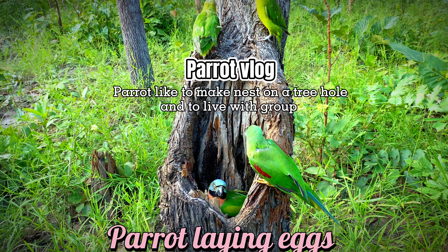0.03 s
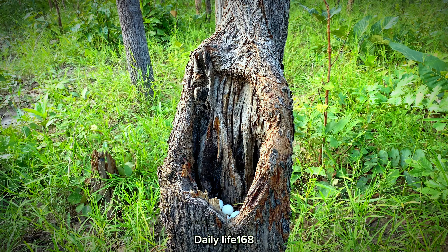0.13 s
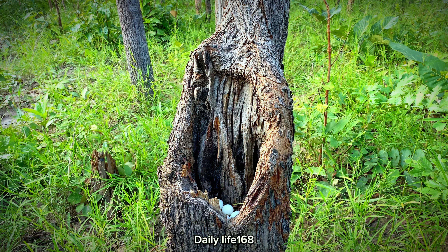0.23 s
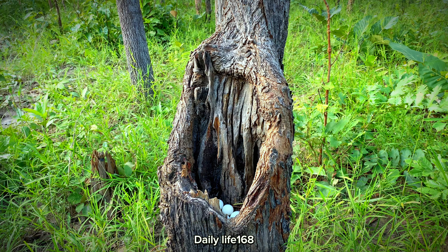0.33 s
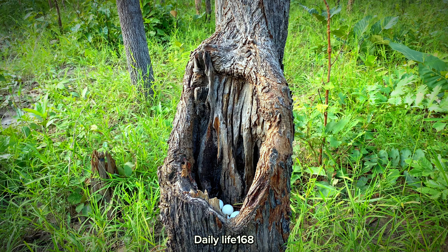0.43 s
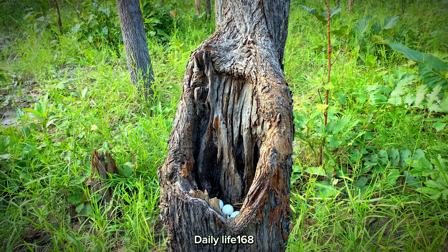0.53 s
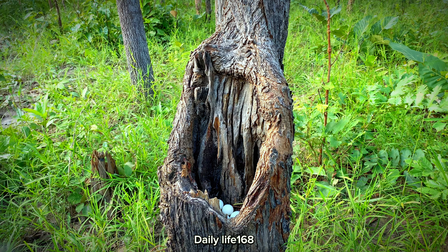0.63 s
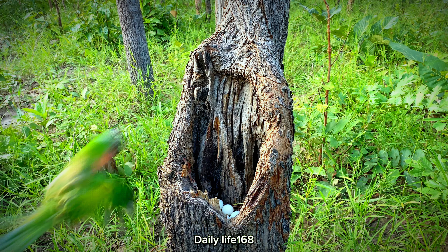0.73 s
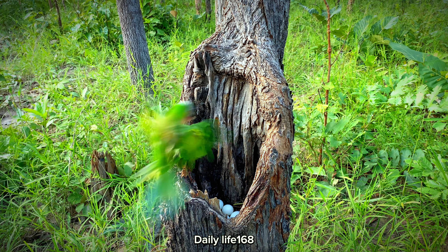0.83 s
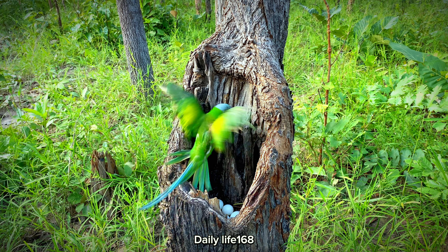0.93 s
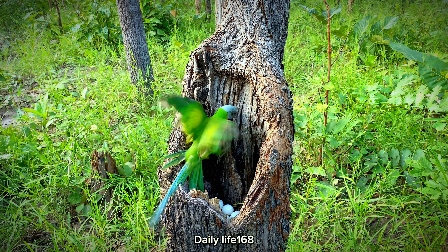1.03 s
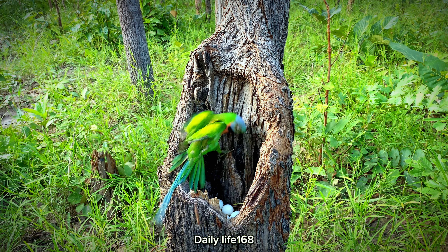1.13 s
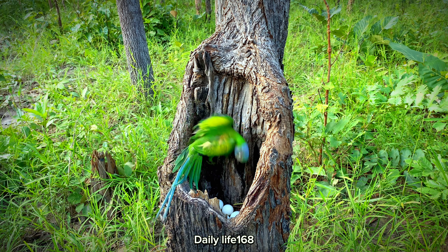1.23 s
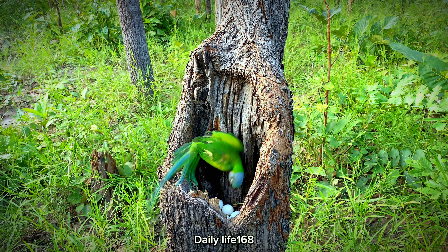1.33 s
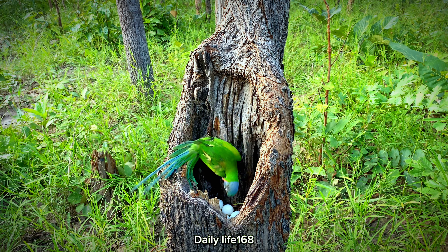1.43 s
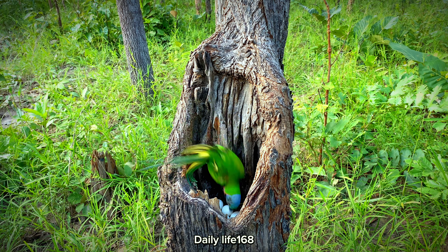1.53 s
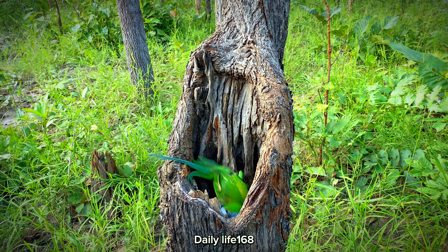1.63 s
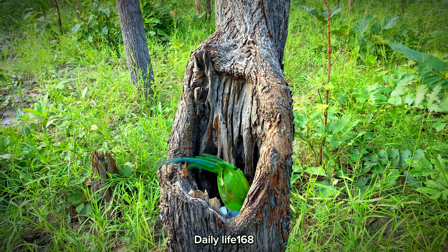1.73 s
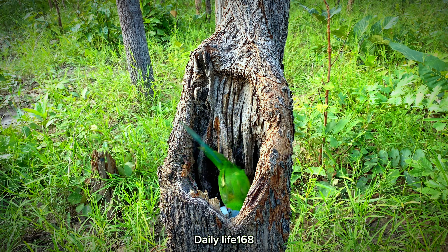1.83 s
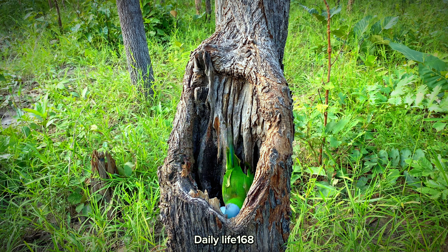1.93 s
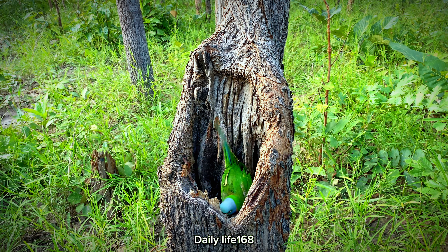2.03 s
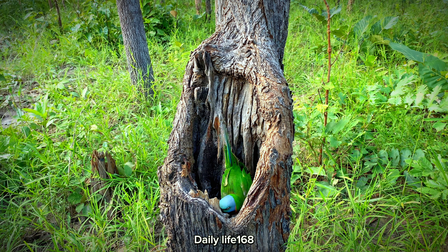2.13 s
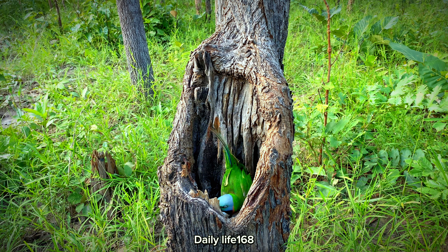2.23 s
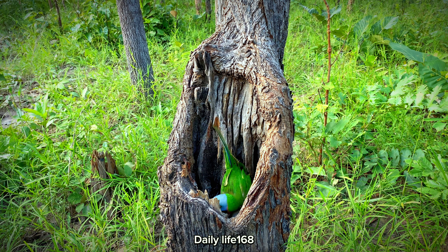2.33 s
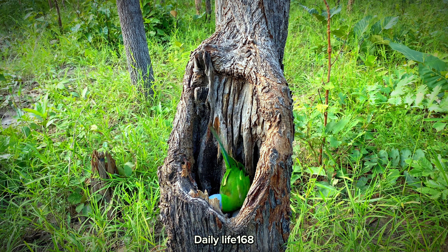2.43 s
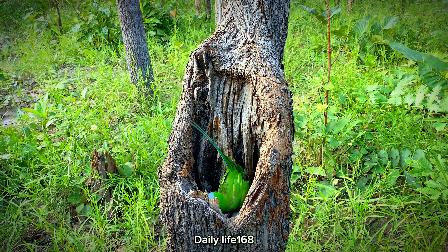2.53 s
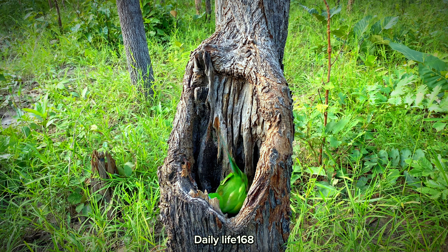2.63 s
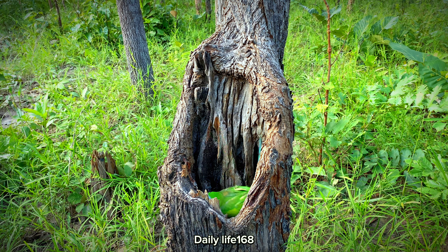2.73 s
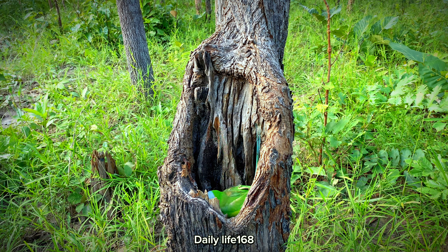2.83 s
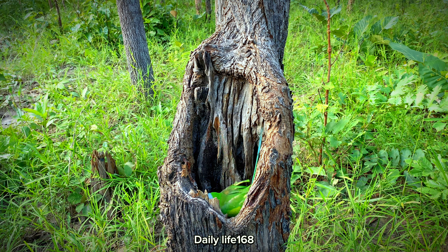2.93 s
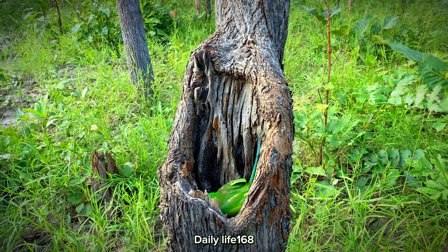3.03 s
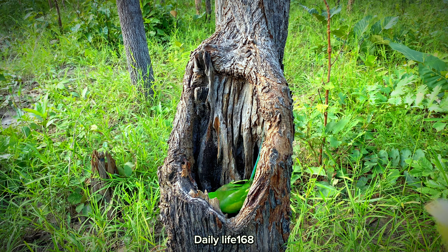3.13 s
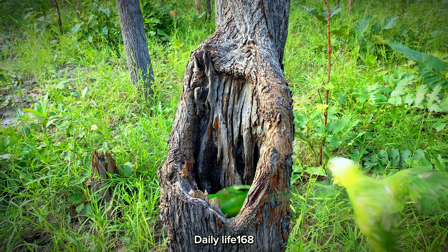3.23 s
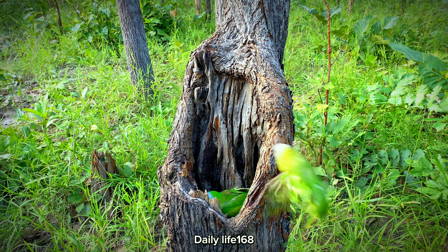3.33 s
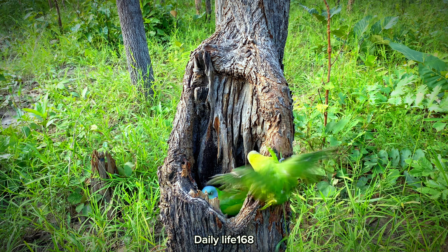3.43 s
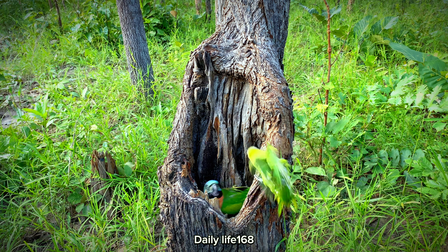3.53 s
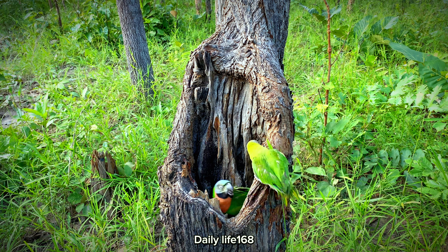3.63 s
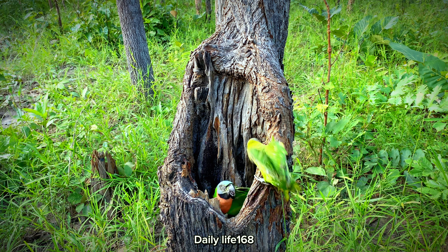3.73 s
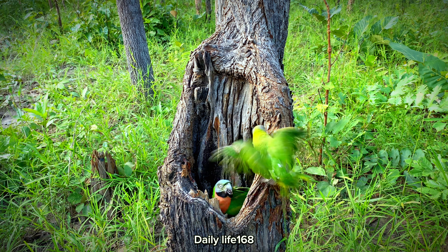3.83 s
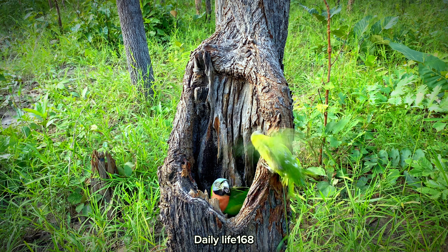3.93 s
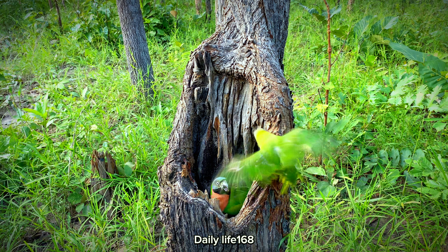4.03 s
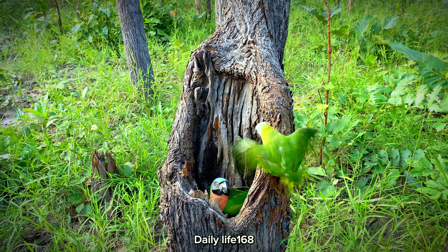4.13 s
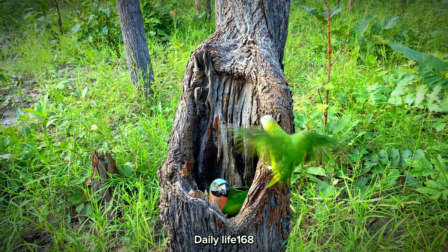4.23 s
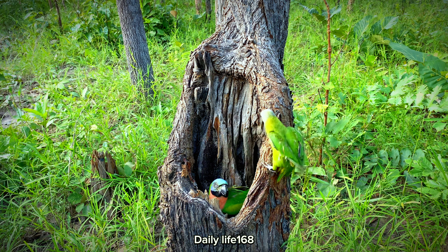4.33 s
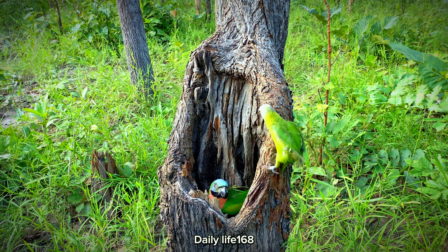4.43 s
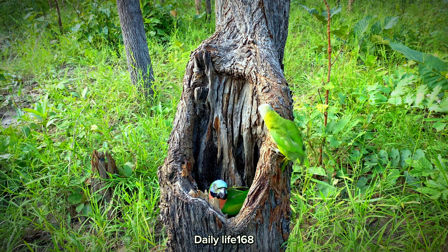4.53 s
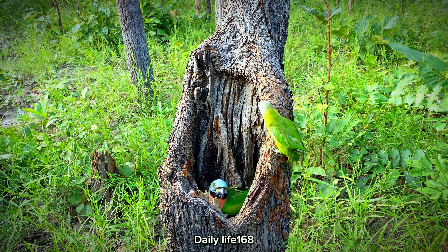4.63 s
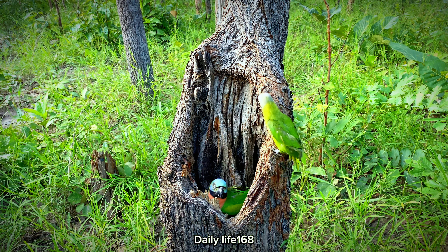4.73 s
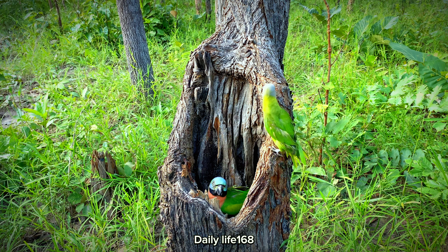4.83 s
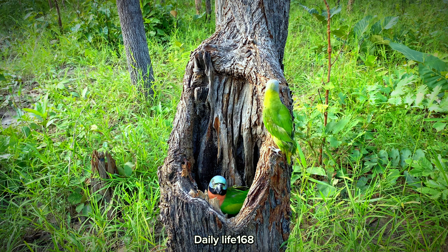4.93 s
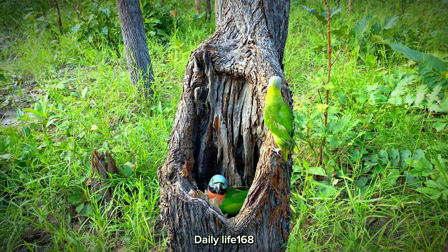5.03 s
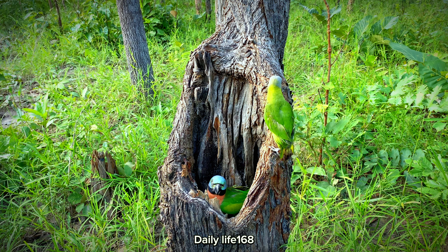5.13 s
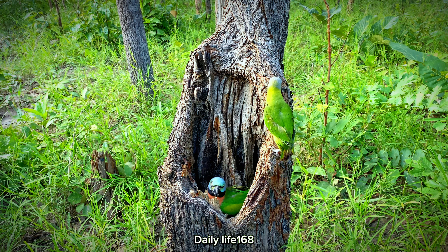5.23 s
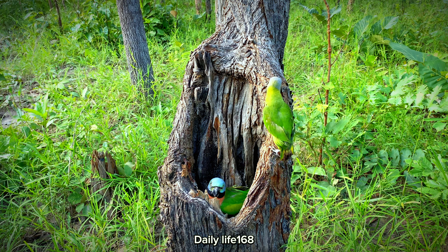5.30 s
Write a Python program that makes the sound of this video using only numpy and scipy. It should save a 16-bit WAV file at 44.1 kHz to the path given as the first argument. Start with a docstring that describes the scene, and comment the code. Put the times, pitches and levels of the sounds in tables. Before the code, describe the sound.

Outdoors among trees, a parakeet's wings suddenly clap and flutter close to the microphone. Its claws tick and scrape on a hollow trunk while its feathers rustle. A second flurry of wingbeats follows, then a dry rasp of stiff feathers and more light scratching, before a third flurry with another rasp. A distant engine drones in a steady low rumble behind, with faint insects.

```python
"""A sudden clap of wings opens the first of three flurries as parakeets fly to a hollow tree.
Wings push air, feathers rustle and slap together, and twice stiff feathers slip with a dry rasp.
Between flights the birds shuffle their plumage, and claws tick, scrape and squeak on the bark.
Behind them a distant engine drones in a low outdoor rumble, with faint insects and a dull ticking."""
import sys
import numpy as np
from scipy import signal
from scipy.fft import rfft, irfft, next_fast_len
from scipy.io import wavfile
from scipy.ndimage import uniform_filter1d, map_coordinates

SR = 44100
rng = np.random.default_rng(int(sys.argv[2]) if len(sys.argv) > 2 else 0)


def master(y):
    """Save y as 16-bit WAV."""
    cut = np.clip(np.atleast_2d(y).T, -1, 1)
    pcm = np.round(cut * 32767)  # scale
    wavfile.write(sys.argv[1], SR, pcm.astype(np.int16))


N = 264600
TIME = np.arange(N) / SR
CENTRE, SIDES = np.array([[1], [0]]), np.array([[.5], [-.5]])  # spread() puts row 0 in the centre

# Levels in the tables are relative: the functions add their own gains.
# The tone colour of each noise: f/Hz, level/dB
RUMBLE_COLOUR = [(20, -21), (35, 0.5), (52, -4.5), (90, 1.5), (135, 4.5), (180, -7), (280, -17),
                 (480, -13.5), (680, -19.5), (1200, -29.5), (3000, -51), (7000, -57.5), (15000, -52)]  # the outdoors
TRUNK_COLOUR = [(150, -31), (420, 3), (700, -1), (1200, -22), (3000, -23), (9000, -29)]  # hollow wood
FEATHER_COLOUR = [(300, 12), (700, 5.5), (950, 6), (2000, 8.5), (4500, 6.5), (7000, 3), (10000, 9),
                  (14000, -2.5), (15200, 2), (16300, -24)]  # sliding feathers
RASP_EQ = [(100, -3), (250, -6), (330, 1), (680, 0.5), (1020, -9.5), (1300, 1.5), (2300, -0.5), (2900, 2.5),
           (3300, -0.5), (9500, -1.5), (11500, -3), (14000, -2.5)]  # stiff feathers, on top of their resonances
AIR_COLOUR = [(20, -11), (45, 4.5), (85, 4), (170, -5), (260, -15), (500, -43.5)]  # air pushed by a wing
SWISH_COLOUR = [(120, -13), (250, 4.5), (450, 6), (660, 8.5), (820, -5.5), (1200, -9), (2000, -20.5)]  # air through the wing tips
CRACK_COLOUR = [(300, -6.5), (700, -19), (1000, -11), (1400, -1.5), (2000, -2.5), (4000, 3.5), (7000, -2),
                (10000, 1.5), (14000, -7.5), (16500, -12.5)]  # sharp hits of feathers and claws

# Tones of the far engine: f/Hz, level/dB
ENGINE_TONES = [(57.5, -48), (114, -45)]
# Shrill insect bands: f/Hz, width/Hz, level/dB
INSECT_BANDS = [(4570, 590, -64), (7720, 550, -69)]
# Feet and bodies scuffing wood: middle t/s, half length/s, grating level/dB, trunk level/dB, f/Hz
BARK_SCUFFS = [(0.837, 0.013, -42, -40.5, 1950), (0.974, 0.006, -36, -60, 6000),
               (1.134, 0.0083, -49, -67, 1550), (1.216, 0.014, -42, -74, 3900),
               (1.561, 0.024, -56, -42.5, 1830), (1.603, 0.019, -54, -40.5, 1870),
               (1.644, 0.031, -50, -45, 2300), (1.788, 0.0082, -52, -43, 1500),
               (1.881, 0.023, -54, -60, 1800), (1.997, 0.012, -60, -46, 1490),
               (2.717, 0.07, -65.5, -44, 2070), (2.832, 0.081, -77, -47, 2200),
               (3.024, 0.0052, -46, -28.5, 1410), (3.446, 0.016, -39.5, -41, 2040),
               (3.898, 0.091, -54, -41, 2400), (4.123, 0.0063, -40.5, -46, 2290),
               (4.212, 0.036, -56, -48.5, 2380), (4.307, 0.0083, -72, -44.5, 2200),
               (3.962, 0.0081, -36, -33.5, 2200), (3.981, 0.0077, -27.5, -27, 2100),
               (5.407, 0.011, -48, -50, 2100), (5.445, 0.017, -43.5, -51, 2240),
               (5.483, 0.016, -43.5, -46, 2300)]
# Skidding claws: middle t/s, half length/s, level/dB, f/Hz, glide/(Hz/s)
CLAW_SKIDS = [(1.136, .008, -53, 1406, 0.5), (1.222, 0.014, -48, 2380, -6000),
              (1.879, 0.019, -48.5, 1873, 5000)]
# Claws snagging bark: t/s, level/dB, f/Hz, extra gain of the tick/dB
CLAW_SNAGS = [(0.8232, -18.5, 1900, -13), (1.1507, -37, 5200, -1), (1.442, -41, 5870, 3),
              (1.468, -36, 4580, -1), (1.5125, -20, 4000, 0), (1.526, -21.5, 3300, -15),
              (1.531, -28, 3430, -12), (1.546, -21, 2870, -1), (1.564, -25, 4400, -3.5),
              (1.5662, -25.5, 6550, -3), (1.588, -34, 1860, -9), (1.6207, -19, 1500, -20),
              (1.622, -26, 3480, -18), (1.6303, -29, 1900, -18), (1.635, -27, 3000, -18.5),
              (1.64, -37, 1790, -15), (1.648, -36, 3130, -14), (1.6622, -31.5, 2790, -18),
              (1.665, -33, 2300, -18), (1.697, -36, 1900, -14), (1.7725, -20.5, 4700, 0),
              (2.593, -42.5, 4370, 2.5), (2.658, -34.5, 4100, -3), (3.5579, -34.5, 6030, -2),
              (3.67, -37, 3740, -16), (4.2045, -37, 4350, -5), (4.24, -37, 2680, 1), (4.373, -40, 4030, 3),
              (4.381, -40, 6000, 0), (4.5326, -39, 6030, -1), (4.7895, -38, 3200, -4),
              (4.9665, -43.5, 4540, -2)]
# A bird shifting its plumage: start t/s, end t/s, level/dB
PLUMAGE_SHUFFLES = [(0.954, 1.385, -54), (1.535, 1.58, -48), (1.777, 1.914, -57.5), (2.43, 2.99, -64.5),
                    (2.822, 2.85, -56), (3.51, 3.525, -52), (3.822, 4.342, -53), (3.866, 3.891, -43),
                    (4.775, 4.97, -71), (5.203, 5.376, -62), (5.445, 5.52, -44)]
# Stiff feathers rasping: t/s, rise/s, fall/s, level/dB, slips/(1/s), left minus right/dB,
# pitch factor, hollow tone level/dB, its glide/(Hz/s), t/s at which a resonance sinks
FEATHER_RASPS = [(3.997, 0.016, 0.036, -23, 230, 0.5, 1, -29, 500, 4.0),
                 (5.912, 0.024, 0.025, -19, 340, 0.5, 1.03, -24, 700, 5.897)]
# Resonances of a rasp: base f/Hz, base width/Hz, level/dB
RASP_RESONANCES = [(427, 220, 2), (610, 230, -2.5), (1490, 220, -1.5), (1980, 610, -6), (3330, 110, 2),
                   (3900, 270, 1), (4950, 260, 1.5), (5910, 280, -9.5), (7130, 270, -12.5), (8870, 510, -9),
                   (14000, 1500, -27)]
# Hard catches within the rasps: t/s, level/dB
RASP_CATCHES = [(3.9745, -20), (3.9831, -21), (3.9866, -18), (3.9929, -10.5), (3.9965, -14),
                (4.0041, -11.5), (4.0165, -12), (4.027, -22), (4.0344, -17), (4.0484, -24.5), (5.9185, -18),
                (5.9263, -20), (5.9333, -19), (5.9415, -27)]
# Flurries of flight: start t/s, end t/s, air level/dB, swish level/dB, rustle level/dB, hollow f/Hz
FLURRIES = [(0.547, 0.922, -33.5, -45.5, -47.5, 444), (3.024, 3.426, -31, -43, -44, 641),
            (5.53, 6, -35.5, -39.5, -40.5, 432)]
# Heavy wing strokes: t/s, air level/dB, swish level/dB, hollow tone level/dB, its f/Hz
HEAVY_STROKES = [(.645, -24, -39.5, -37, 478.6), (0.84, -37.5, -36, -39, 388),
                 (0.913, -28.5, -35, -29.5, 189), (3.112, -25.5, -41, -42, 780), (3.14, -34, -36, -34, 649),
                 (3.218, -36.5, -42.5, -33.5, 310), (3.291, -33, -38.5, -33.5, 370),
                 (3.356, -41, -39, -35, 570), (5.532, -24.5, -31.5, -41, 560),
                 (5.622, -25, -32.5, -45, 512), (5.684, -26.5, -34.5, -34, 247), (5.72, -20, -38, -31, 240),
                 (5.745, -38, -35.5, -30, 581), (5.79, -37.5, -29.5, -28, 620), (5.77, -28, -37, -32, 200),
                 (5.816, -41.5, -35.5, -28, 487), (5.985, -31, -35, -33.5, 530)]
# Wing claps: t/s, crack level/dB, thump level/dB, thump f/Hz, crack fade time/s,
# quill f/Hz, extra gain of the snap/dB, slap level/dB, slap f/Hz
WING_CLAPS = [(0.5545, -20.5, -17, 400, 0.0055, 1970, 20, -24.5, 890),
              (0.6313, -12, -18, 330, 0.028, 2200, 0.5, -22, 950),
              (0.6376, -25.5, -10, 165, 0.025, 2100, -4, -26, 650),
              (0.7288, -16.5, -23, 526, 0.0076, 4000, 9.5, -22.5, 1190),
              (0.8718, -19, -16, 430, 0.02, 5100, 0, -31.5, 700),
              (0.889, -10, -11, 430, 0.013, 2150, 6, -9.5, 1080),
              (0.8966, -20, -13, 210, 0.03, 4100, 8.5, -11, 860),
              (0.984, -9.5, -13.5, 560, 0.021, 2000, 0.5, -9.5, 940),
              (3.044, -22.5, -17.5, 636, 0.022, 1870, 3, -30, 1700),
              (3.0691, -21, -24, 325, 0.026, 3880, 3.5, -28, 1600),
              (3.1054, -15.5, -22, 312, 0.026, 2120, -2, -33, 1590),
              (3.179, -14, -17.5, 655, 0.028, 4200, 3.5, -23, 1900),
              (3.1932, -25.5, -25.5, 576, 0.042, 2480, -6, -31, 1400),
              (3.2512, -18, -21.5, 467, 0.024, 2360, -1, -31, 900),
              (3.2673, -26.5, -32.5, 400, 0.03, 2300, 0.5, -43, 900),
              (3.3223, -19.5, -26, 692, 0.039, 2940, 0, -34, 1300),
              (3.338, -26, -26.5, 585, 0.094, 2030, -2, -40, 900),
              (3.391, -16, -12, 463, 0.0383, 2720, -3, -25, 870),
              (3.8756, -27, -26.5, 420, 0.035, 3480, 0, -40, 900),
              (5.5468, -13.5, -15, 216, 0.033, 2100, 1.5, -18.5, 900),
              (5.5535, -25.5, -25, 400, 0.022, 1840, -0.5, -22, 1820),
              (5.6143, -31.5, -28, 348, 0.13, 2300, -10, -30, 950),
              (5.6612, -27, -20, 248, 0.02, 2640, 2.5, -28, 780),
              (5.665, -36, -15, 180, 0.02, 2500, -4, -40, 650),
              (5.71, -25, -26, 580, 0.068, 2420, -5, -26.5, 900),
              (5.7485, -23.5, -15.5, 342, 0.046, 2680, -3.5, -23, 750),
              (5.7788, -19, -10.5, 423, 0.076, 1520, 5, -15, 1090),
              (5.797, -20, -23, 580, 0.022, 2020, -0.5, -28, 1600),
              (5.9559, -15.5, -10, 425, 0.025, 3870, 0.5, -24, 1100)]

# How alike left and right are: f/Hz, likeness (0 unrelated, 1 the same)
NEAR_LIKENESS = [(200, .97), (700, .93), (1500, .75), (3000, .75), (5500, .68), (8000, .92), (14500, .9)]  # the birds
FAR_LIKENESS = [(150, 0.96), (550, 0.22), (1600, 0.043), (5000, .2)]  # distant sound
RASP_LIKENESS = [(400, 0.97), (5000, 0.39)]  # a rasp, which comes from one spot
# How far the left channel leads the right: f/Hz, phase/rad
LEFT_LEAD = [(100, 0), (700, -.3), (1200, .8), (3000, 1.4), (5500, 1.3), (6700, 0), (8350, -3.14),
             (10100, -6.28), (12150, -9.42), (14000, -12.57), (15800, -15.7)]
# How much louder the left channel is: f/Hz, level/dB
LEFT_GAIN = [(60, -1.5), (130, -3.5), (300, 1), (700, 0.5), (1300, 0.5), (2200, 1.5), (4500, 4), (7500, 2),
             (9500, 0)]


def amp(db):
    """Turn decibels into a gain; amp(-60 * t / t60) fades by 60 dB in t60 seconds."""
    return 10 ** (np.asarray(db) / 20)


def unit(x):
    """Scale x to an average (rms) level of 1."""
    return x / np.sqrt(np.mean(x ** 2) + 1e-20)


def along(points, hz):
    """Read between (Hz, value) points on a log frequency axis."""
    f, v = np.transpose(points)
    return np.interp(np.log(hz + 1), np.log(f + 1), v)


def wobble(rate):
    """A smooth random curve through `rate` points a second."""
    return map_coordinates(rng.standard_normal(int(N * rate / SR) + 4), [TIME * rate])


def white(size=N):
    """Two unrelated hisses."""
    return rng.standard_normal((2, size))


def gritty(grit_db, rate):
    """Two hisses broken into tiny grains of uneven size."""
    return white() * amp(grit_db * wobble(rate))


def filtered(x, response):
    """Give each frequency in x the gain and phase of response(hz)."""
    n = x.shape[-1]
    padded = next_fast_len(n + 8192)
    return irfft(rfft(x, padded) * response(np.fft.rfftfreq(padded, 1 / SR)), padded)[..., :n]


def coloured(x, colour):
    """Give x a tone colour, at level 1."""
    return unit(filtered(x, lambda hz: amp(along(colour, hz))))


def resonance(hz, centre, width):
    """The response of something that rings near one pitch."""
    return 1j * hz * width / (centre ** 2 - hz ** 2 + 1j * hz * width)


def ringing(hz, share, size=N):
    """Two noises ringing near hz; a larger share of that pitch makes the band wider."""
    return unit(filtered(white(size), lambda f: resonance(f, hz, share * hz) ** 2))


def gliding(hz, width):
    """Two noises ringing near a pitch that moves."""
    slow = lambda: filtered(white(len(hz)), lambda f: 1 / (1 + (2 * f / width) ** 4))
    phase = 2 * np.pi * np.cumsum(hz) / SR
    return unit(slow() * np.cos(phase) + slow() * np.sin(phase))


def fluttering(hz, size, waver=0.062, rate=160):
    """A tone whose pitch flutters, in row 0 only."""
    bend = map_coordinates(rng.standard_normal(256), [np.arange(size) * rate / SR])
    cycles = np.cumsum(hz * (1 + waver * bend)) / SR + rng.random()
    return np.sqrt(2) * np.sin(2 * np.pi * cycles) * CENTRE


def held(start, end, attack_s=0.037, release_s=0.082):
    """A loudness curve that grows until start, holds until end and dies away."""
    return np.exp(-np.maximum(start - TIME, 0) / attack_s - np.maximum(TIME - end, 0) / release_s)


def burst(noise, envelope):
    """Noise shaped by a loudness curve, with just the energy of that curve."""
    x = noise * envelope
    return x * np.sqrt(np.sum(envelope ** 2) / (np.sum(x ** 2, axis=-1, keepdims=True) + 1e-20))


def add(track, s, sound):
    """Mix a sound in from second s."""
    part = track[:, round(s * SR):][:, :sound.shape[-1]]
    part += sound[..., :part.shape[-1]]


def spread(pair, likeness):
    """Turn two unrelated signals into left and right of a given likeness."""
    turn = lambda hz: np.arccos(np.clip(along(likeness, hz), 0, 1)) / 2
    mid, side = filtered(pair, lambda hz: np.array([np.cos(turn(hz)), np.sin(turn(hz))]))
    return np.array([mid + side, mid - side])


def rumble(level_db=-42, swell_db=1.8):
    """The low outdoor rumble gently swells and ebbs."""
    return amp(level_db + swell_db * wobble(8)) * spread(coloured(white(), RUMBLE_COLOUR), FAR_LIKENESS)


def engine(waver_db=1.2, drift_hz=1.31):
    """A far engine drones on two low tones that waver in level and pitch."""
    out = np.zeros(N)
    for hz, db in ENGINE_TONES:
        level = amp(db + waver_db * wobble(8))
        phase = 2 * np.pi * np.cumsum(hz + drift_hz * wobble(6.4)) / SR
        out += level * np.sqrt(2) * np.sin(phase)
    return out


def insects(ebb_db=1.2, waver_db=1.5):
    """Insects shrill in two thin, wavering bands."""
    return sum(amp(db + ebb_db * wobble(3.5) + waver_db * wobble(12)) * ringing(hz, width / hz)
               for hz, width, db in INSECT_BANDS)


def ticking(level_db=-70, ticks_per_s=20.0, tick_hz=1150, width_hz=1500):
    """A faint, dull ticking runs evenly, each tick of a different size."""
    beats = np.diff(np.floor(TIME * ticks_per_s), prepend=0)
    beats *= amp(2.5 * rng.standard_normal(N))
    return amp(level_db) * unit(filtered(beats, lambda hz: resonance(hz, tick_hz, width_hz) ** 3))


def nest(level_db=-57, stir_db=3.0):
    """A bird stirs softly in the hollow, which answers in its low woody tone."""
    stirring = gritty(grit_db=3.0, rate=370) * amp(stir_db * wobble(22))
    return amp(level_db) * coloured(stirring, TRUNK_COLOUR)


def squeaks():
    """A skidding claw gives a soft, rough note that glides."""
    out, t = np.zeros((2, N)), np.arange(6144) / SR
    t -= t.mean()
    for s, half, db, hz, glide in CLAW_SKIDS:
        note = fluttering(hz + glide * t, len(t), waver=0.087, rate=1300)
        add(out, s + t[0], amp(db) * np.exp(-(t / half) ** 2) * note)
    return out


def scuffs(grit_db=5.5, grains_per_s=520):
    """Each short rub over the bark grates at its own pitch and stirs the hollow trunk."""
    out, t = np.zeros((2, N)), np.arange(SR // 2) / SR - .25
    for s, half, db, trunk_db, hz in BARK_SCUFFS:
        catches = white(len(t))
        catches *= amp(grit_db * map_coordinates(rng.standard_normal(512), [(t - t[0]) * grains_per_s]))
        grate = amp(db) * unit(filtered(catches, lambda f: resonance(f, hz, 0.69 * hz) ** 2))
        trunk = amp(trunk_db) * coloured(catches, TRUNK_COLOUR)
        add(out, s + t[0], np.exp(-(t / half) ** 2) * (grate + trunk))
    return out


def claws(ring_db=-1, ring_t60=0.0095, tick_t60=0.008):
    """Claws snag the bark, each with a sharp tick and its own short ring."""
    out, t = np.zeros((2, N)), np.arange(2048) / SR
    rise = 1 - np.exp(-t / 0.00031)
    for s, db, hz, tick_db in CLAW_SNAGS:
        ring = burst(ringing(hz, share=0.95, size=len(t)), rise * amp(ring_db - 60 * t / ring_t60))
        tick = burst(coloured(white(len(t)), CRACK_COLOUR), rise * amp(tick_db - 60 * t / tick_t60))
        add(out, s, amp(db) * (ring + tick))
    return out


def rustle(gain_db=4, resting_db=-72.5, spurt_db=2.5, drift_db=3.5):
    """Feathers slide over each other in countless small catches, louder in flights and shuffles."""
    moves = [amp(db) * held(start, end) for start, end, _, _, db, _ in FLURRIES]
    moves += [amp(db) * held(start, end, attack_s=0.035, release_s=0.063)
              for start, end, db in PLUMAGE_SHUFFLES]
    motion = np.sqrt(amp(resting_db) ** 2 + sum(move ** 2 for move in moves))
    catches = gritty(grit_db=4, rate=690) * amp(spurt_db * wobble(60) + drift_db * wobble(12))
    return amp(gain_db) * motion * coloured(catches, FEATHER_COLOUR)


def feather_slips(t, rate, jitter=0.23, size_db=2, t60=0.033):
    """The force of a quick, uneven run of slips, each grating for a moment."""
    timing, sizes = rng.standard_normal((96, 2)).T
    times = np.abs(np.arange(96) + jitter * timing) / rate
    slips = np.bincount(np.round(times * SR).astype(int), amp(size_db * sizes), len(t))[:len(t)]
    return unit(signal.fftconvolve(slips, amp(-60 * t / t60))[:len(t)])


def rasp_response(hz, widen=1.93):
    """How strongly the steady resonances of a rasp ring at each frequency."""
    power = sum(np.abs(amp(db) * resonance(hz, centre, widen * width) ** 2) ** 2
                for centre, width, db in RASP_RESONANCES)
    return amp(along(RASP_EQ, hz)) * np.sqrt(power)


def rasps(catch_t60=0.016, high_hz=2150, low_hz=1546, sink_s=0.014, tone_hz=420, tone_lag_s=0.0055):
    """Stiff feathers slip and catch, ringing steady resonances and a sinking one over a hollow tone."""
    out, t = np.zeros((2, N)), np.arange(8192) / SR
    age = t - t.mean()
    for s, rise, fall, db, rate, pan_db, pitch, tone_db, glide, sink_at in FEATHER_RASPS:
        now = s + age
        swell = np.exp(-np.abs(age / np.where(age < 0, rise, fall)) ** 1.56)
        catches = sum((now >= at) * amp(catch_db - 60 * np.abs(now - at) / catch_t60)
                      for at, catch_db in RASP_CATCHES)
        force = np.hypot(amp(db) * feather_slips(t, rate) * swell, catches)
        grate = filtered(white(len(t)) * force, lambda hz: rasp_response(hz / pitch))
        grate = unit(spread(grate, RASP_LIKENESS)) * np.sqrt(np.mean(force ** 2))
        early = (1 - np.tanh((now - sink_at) / sink_s)) / 2  # falls from 1 to 0
        ring = spread(gliding(low_hz + (high_hz - low_hz) * early, width=700), RASP_LIKENESS)
        ring = burst(ring, uniform_filter1d(force, size=32) * amp(-6.5 + 4 * early))
        tone = fluttering(pitch * tone_hz + glide * age, len(t))[0]
        tone *= amp(tone_db) * np.exp(-((age - tone_lag_s) / 0.035) ** 2)
        add(out, now[0], amp(pan_db * SIDES) * (grate + ring) + tone)
    return out


def wingbeats(swish_db=-5, hollow_db=-3, flutter_db=3):
    """Each flight shoves air and swishes through the wing tips with a fluttering hollow tone."""
    air = coloured(white(), AIR_COLOUR)
    swish = amp(swish_db) * coloured(gritty(grit_db=-3.0, rate=57), SWISH_COLOUR)
    flutter = unit(amp(flutter_db * wobble(45)))
    out = np.zeros((2, N))
    for start, end, air_db, speed_db, _, hz in FLURRIES:
        hollow = amp(hollow_db) * flutter * ringing(hz, share=0.22)
        out += held(start, end) * (amp(air_db) * air + amp(speed_db) * (swish + hollow))
    return out


def strokes(swell_half_s=0.0204, tone_half_s=0.009):
    """A heavy wing stroke is a swell of air and swish, with a brief hollow tone."""
    out, t = np.zeros((2, N)), np.arange(6144) / SR
    t -= t.mean()
    swell, brief = np.exp(-(t / swell_half_s) ** 2), np.exp(-(t / tone_half_s) ** 2)
    for s, air_db, swish_db, tone_db, hz in HEAVY_STROKES:
        air = amp(air_db) * burst(coloured(white(len(t)), AIR_COLOUR), swell)
        swish = amp(swish_db) * burst(coloured(white(len(t)), SWISH_COLOUR), swell)
        tone = amp(tone_db) * brief * fluttering(hz, len(t))
        add(out, s + t[0], air + swish + tone)
    return out


def claps(pop_t60=0.0015, snap_t60=0.0048, slap_t60=0.03, thump_t60=0.036, puff_t60=0.047, sag=0.16):
    """Feathers crack together, a quill pops, the wing slaps the body and squeezed air thumps."""
    out, t = np.zeros((2, N)), np.arange(4096) / SR
    rise, air_rise = 1 - np.exp(-t / 0.0012), (1 - np.exp(-t / 0.0017)) ** 2
    pop_age = np.maximum(t - .001, 0)
    bend = 1 + sag * (np.exp(-t / 0.0053) - .5)  # the thump sinks in pitch
    for s, db, thump_db, thump_hz, t60, quill_hz, snap_db, slap_db, slap_hz in WING_CLAPS:
        crackle = coloured(white(len(t)), CRACK_COLOUR)
        crackle += amp(-5) * ringing(quill_hz, share=0.27, size=len(t))
        snap = amp(snap_db + 4.5 - 60 * np.abs(t - .001) / snap_t60)
        fade = rise * (amp(5 - 60 * t / t60) + amp(-18 - 60 * t / 0.17))  # quick drop, soft tail
        crack = amp(-6) * burst(crackle, snap + fade)
        pop_fade = (pop_age > 0) * amp(3 + snap_db - 60 * pop_age / pop_t60)
        pop = np.cos(2 * np.pi * quill_hz * pop_age) * pop_fade * CENTRE
        slap = burst(ringing(slap_hz, share=0.3, size=len(t)), rise * amp(slap_db - 60 * t / slap_t60))
        phase = 2 * np.pi * np.cumsum(thump_hz * bend) / SR
        thump = np.sin(phase) * amp(4 - 60 * t / thump_t60) * CENTRE
        puff = burst(coloured(white(len(t)), SWISH_COLOUR), amp(-3 - 60 * t / puff_t60))
        add(out, s, amp(db) * (crack + pop) + slap + amp(thump_db) * air_rise * (thump + puff))
    return out


def trees(x, echo_db=-24, t60=0.094):
    """Trunks and leaves scatter the sound, adding a short, faint echo."""
    t = np.arange(16384) / SR
    tail = white(len(t)) * amp(-60 * t / t60)
    return x + amp(echo_db) * signal.fftconvolve(x, tail / np.linalg.norm(tail[0]), axes=1)[:, :N]


def stereo_width(x):
    """Left and right differ in level and phase by pitch, widening the sound."""
    gain = lambda hz: amp(SIDES * along(LEFT_GAIN, hz))
    return filtered(x, lambda hz: gain(hz) * np.exp(1j * SIDES * along(LEFT_LEAD, hz)))


def scene(start_s=0.556, fade_s=0.003):
    """Silence until start_s, then the birds among the trees over the distant background."""
    birds = claps() + wingbeats() + strokes() + rustle() + claws() + scuffs() + squeaks() + nest()
    birds = spread(birds, NEAR_LIKENESS) + rasps()
    mix = trees(birds) + rumble() + engine() + insects() + ticking()
    return stereo_width(mix) * np.clip((TIME - start_s) / fade_s, 0, 1)


def record(dry, top_hz=16300):
    """Cut off peaks at full scale, then remove everything above top_hz."""
    return filtered(np.clip(dry, -1, 1), lambda hz: hz < top_hz)


dry = scene()
out = record(dry)
master(out)
```